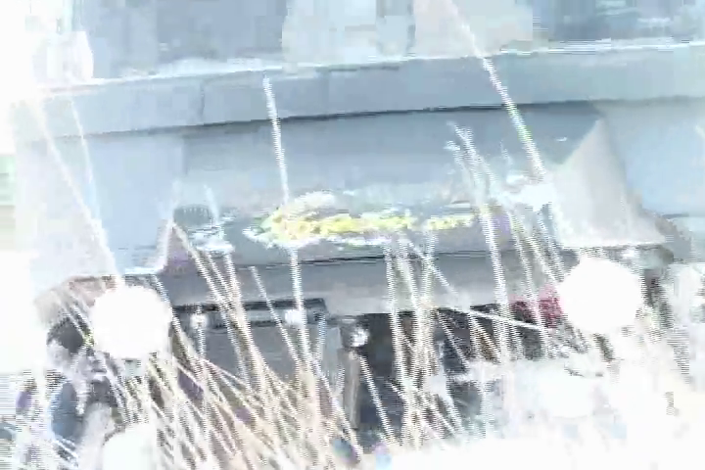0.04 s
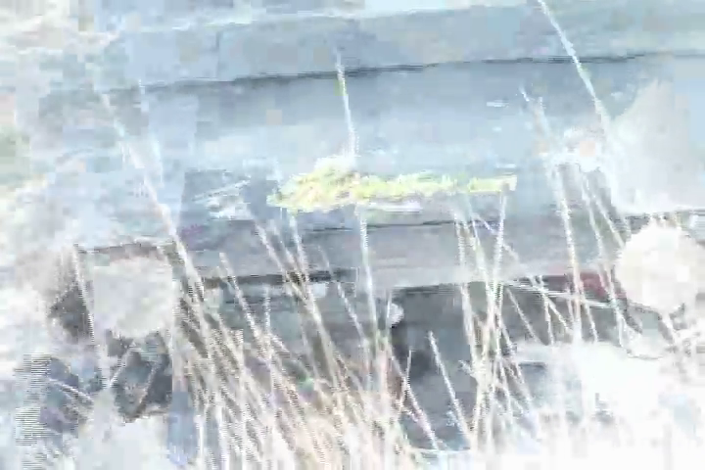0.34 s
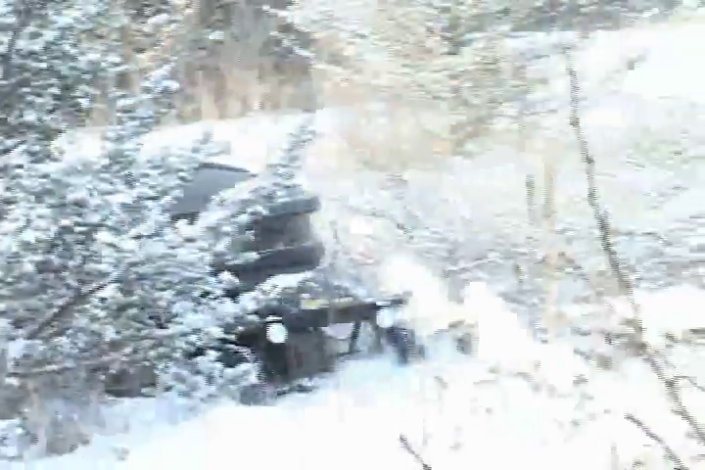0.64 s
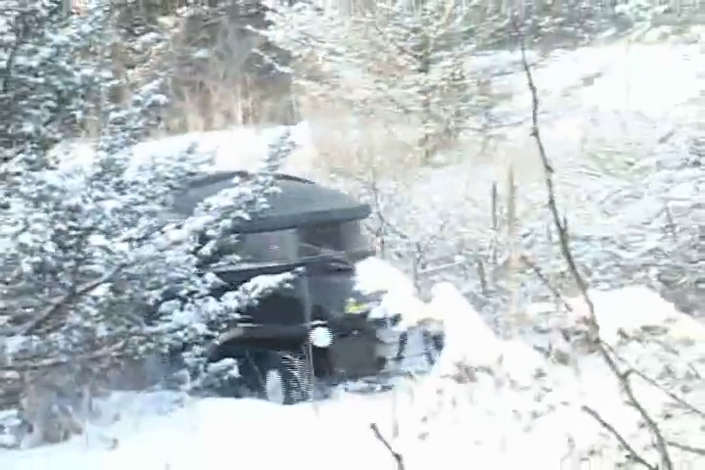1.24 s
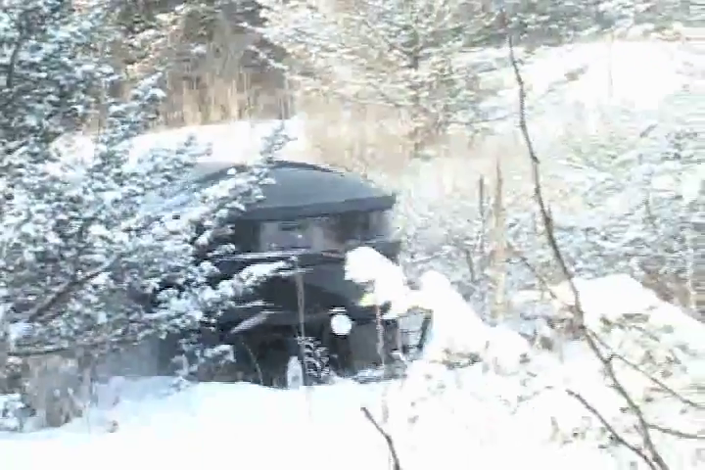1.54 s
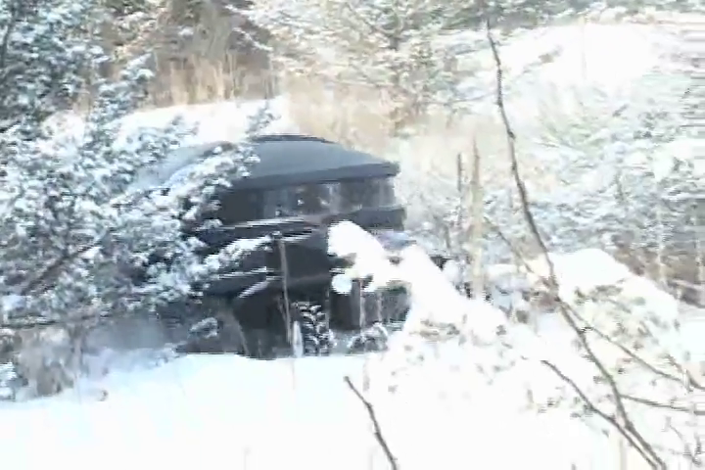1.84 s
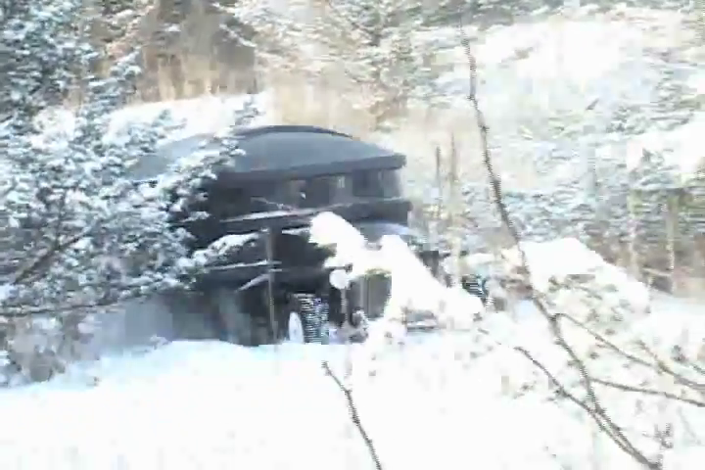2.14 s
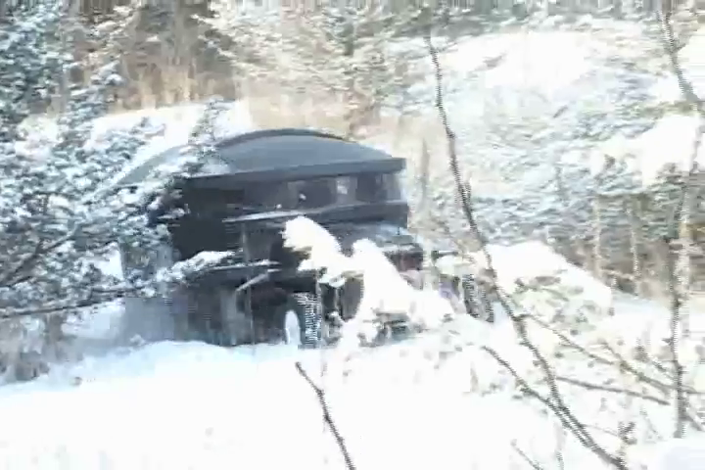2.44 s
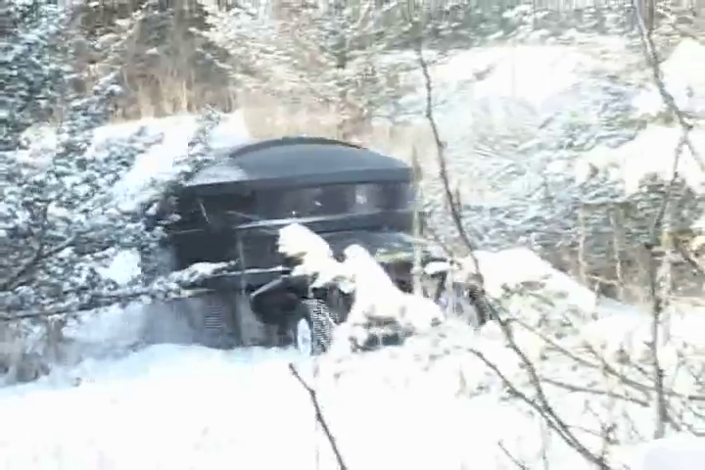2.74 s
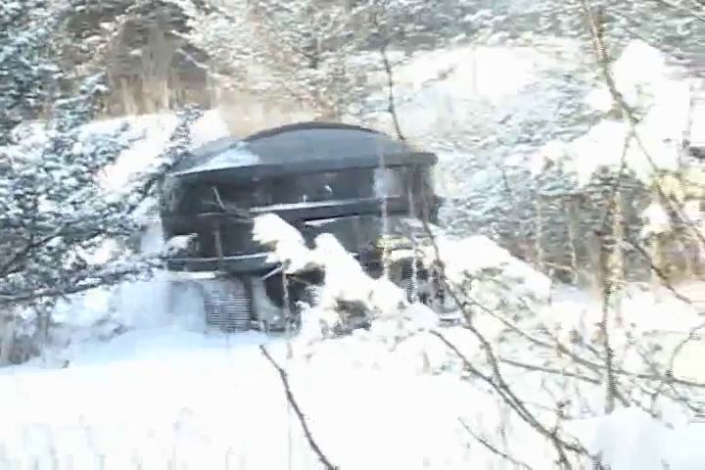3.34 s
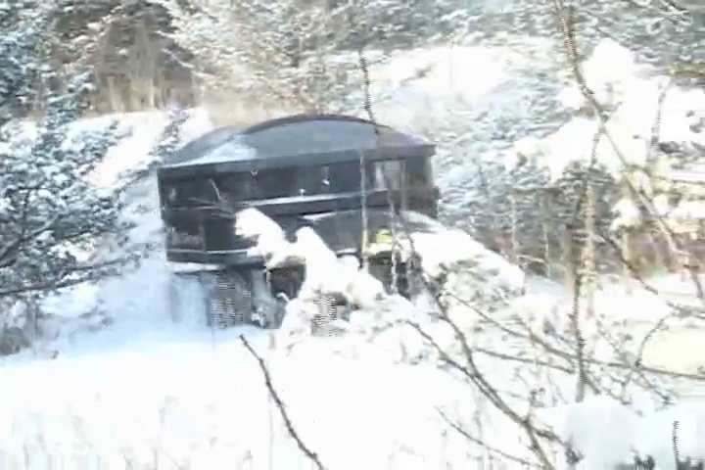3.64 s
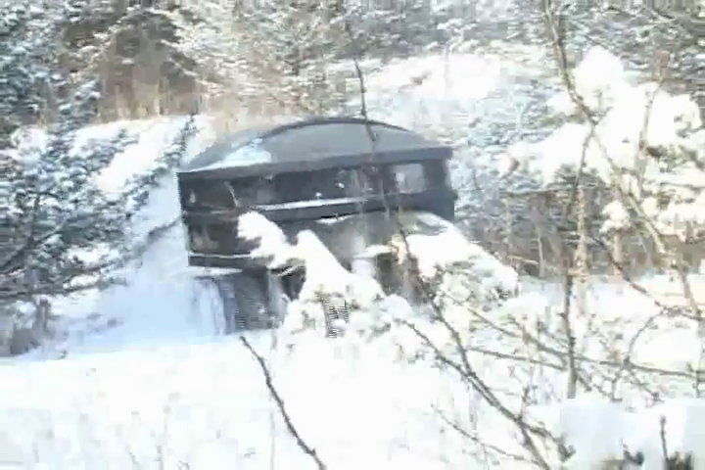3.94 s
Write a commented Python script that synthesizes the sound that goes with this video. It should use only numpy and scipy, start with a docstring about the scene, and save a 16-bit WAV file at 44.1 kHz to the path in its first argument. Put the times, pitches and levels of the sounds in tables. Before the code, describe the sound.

Throbbing, rattling engine of a tracked vehicle, close then farther off, knocking sharply twice.

```python
"""In snowy woods a tracked vehicle labours along, heard first close up, then from among the trees. Its exhaust
throbs, and blows in every turn of the engine make it clatter; from afar a gear whines too. A branch brushes
past, and snow and twigs crunch under the tracks. A low thud comes first, then two sharp, ringing knocks, each
with a dull thud of its own. Between the knocks the sound drops out for an instant. Towards the end, small loose
metal parts tick."""
import sys
import numpy as np
from scipy import signal
from scipy.fft import rfft, irfft
from scipy.io import wavfile
from scipy.ndimage import uniform_filter1d

SR = 44100
rng = np.random.default_rng(int(sys.argv[2]) if len(sys.argv) > 2 else 0)


def waveform_to_disk(signal):
    """Save audio, clipped to [-1, 1], as 16-bit WAV at the path in sys.argv[1]."""
    frames = np.transpose(np.atleast_2d(signal))
    scaled = np.clip(frames, -1, 1) * 32767
    samples = np.round(scaled).astype(np.int16)
    wavfile.write(sys.argv[1], SR, samples)


N = 176400
T = np.arange(N) / SR
HZ = np.fft.rfftfreq(N, 1 / SR)


def amp(db):
    """Turns decibels into a number to multiply by."""
    return 10 ** (np.asarray(db) / 20)


def unit(x):
    """Scales a sound to an average (rms) level of 1."""
    return x / np.sqrt(np.mean(x ** 2) + 1e-20)


def over_time(rows, column=1):
    """Joins the points of a time table with straight lines."""
    rows = np.array(rows)
    return np.interp(T, rows[:, 0], rows[:, column])


def over_hz(rows):
    """Joins the points of a frequency table."""
    hz, value = np.transpose(rows)
    return np.interp(np.log(HZ + 1), np.log(hz + 1), value)


def lows(hz, steepness=4):
    """A filter curve that keeps what lies below hz."""
    return 1 / (1 + (HZ / hz) ** steepness)


def filtered(x, gain):
    """Turns each frequency up or down."""
    return irfft(rfft(x) * gain, N)


def colour(x, db):
    """Shapes the tone with a dB curve, then sets the level to 1."""
    return unit(filtered(x, amp(db)))


def noise():
    """An even hiss."""
    return rng.standard_normal(N)


def sine(hz):
    """A pure tone that starts anywhere in its cycle."""
    return np.sin(2 * np.pi * (hz * T + rng.random()))


def drift(hz, step=25):
    """A random wobble, up to about hz times a second."""
    t = T[::step]
    smooth = np.exp(-(np.fft.rfftfreq(len(t), step / SR) / hz) ** 2)
    slow = irfft(rfft(rng.standard_normal(len(t))) * smooth, len(t))
    return np.interp(T, t, unit(slow))


def strike(start, rise_s, fall_s):
    """The loudness of a hit: it rises quickly, then dies away."""
    age = np.maximum(T - start, 0)
    return np.minimum(age / rise_s, 1) * np.exp(-np.maximum(age - rise_s, 0) / fall_s)


# Tone of the exhaust's low rumble: f/Hz, level/dB
RUMBLE_TONE = [(15, -20), (32, 0), (66, 0), (92, 0), (122, -22), (600, -50)]
def exhaust(turns, notes, waver=0.17, waver_hz=14, throb_db=1.2, rumble_db=-11.5):
    """Notes at multiples of the engine speed waver singly and throb together over a rumble."""
    hum = np.zeros(N)
    for multiple, db in notes:
        level = amp(db) * (1 + waver * drift(waver_hz))
        hum += level * np.cos(2 * np.pi * (multiple * turns + rng.random()))
    throb = amp(throb_db * drift(waver_hz))
    return unit(hum * throb) + amp(rumble_db) * colour(noise(), over_hz(RUMBLE_TONE))


# Blows in each engine turn: place in the turn (0-1), low rattle strength, treble strength
ENGINE_BLOWS = [(0.198, 0.51, 0.27), (0.361, 0.62, 0.63), (0.699, 0.34, 0.39)]
def clatter(turns, tone_db, repeat, uneven_db=3.55, grain_db=1.5, points=1200):
    """Blows in step with the crank ring the engine: a partly repeating rattle and a gritty treble."""
    pattern = np.interp(turns % 1, np.arange(points) / points, rng.standard_normal(points))
    low, high = 1.1, 1  # steady levels under the blows
    for place, low_strength, high_strength in ENGINE_BLOWS:
        blow = np.exp(-((turns - place) % 1) / .22)  # fades over .22 of a turn
        low = low + low_strength * blow * amp(uneven_db * drift(37))
        high = high + high_strength * blow * amp(uneven_db * drift(30))
    rattle = unit(low * (np.sqrt(repeat) * unit(pattern) + np.sqrt(1 - repeat) * noise()))
    surge = amp(2.2 * np.cos(2 * np.pi * (turns - .27)))  # the top treble swells once a turn
    grit = unit(high * noise() * amp(grain_db * drift(240)))
    fizz = unit(high * surge * noise() * amp(grain_db * drift(240)))
    rattle_share, grit_share = lows(2240), lows(7560, steepness=8)
    treble = filtered(grit, np.sqrt(grit_share)) + filtered(fizz, np.sqrt(1 - grit_share))
    both = filtered(rattle, np.sqrt(rattle_share)) + filtered(treble, np.sqrt(1 - rattle_share))
    return colour(both, tone_db)


# Exhaust notes close up: multiple of the engine speed, level/dB
CLOSE_NOTES = [(1, -7.5), (1.5, -15), (2, -0.5), (3, -.5), (4, -18), (5, -10.5), (11, -22), (16, -14.5),
               (19, -17)]
# Tone of the clatter close up: f/Hz, level/dB
CLOSE_TONE = [(120, -29), (200, -3.5), (268, -20), (392, -10), (480, -9), (600, -2.5), (812, -2.5),
              (923, -8.5), (1080, 0), (1220, 0.5), (1450, -11), (1710, -3), (2250, -8), (2470, -4),
              (3240, -4), (4030, -10), (8820, -18.5), (15500, -36)]
def close_engine(turns, exhaust_db=-24.5, clatter_db=-26.5):
    """Beside the engine, the exhaust is a little louder than the clatter."""
    hum = exhaust(turns, CLOSE_NOTES, waver=0.24)
    rattle = clatter(turns, over_hz(CLOSE_TONE), repeat=0.34, grain_db=-0.1)
    return amp(exhaust_db) * hum + amp(clatter_db) * rattle


def flicker(x, depth_db=1.13, rate_hz=9, count=8):
    """Each frequency band swells and fades a little on its own."""
    place = np.interp(np.log(HZ + 1), np.log([450, 11000]), [0, count - 1])
    bands = [filtered(x, np.maximum(1 - abs(place - k), 0)) for k in range(count)]
    return unit(sum(band * amp(depth_db * drift(rate_hz)) for band in bands))


# How hard the engine works, heard from the trees: t/s, exhaust level/dB, clatter level/dB
ENGINE_EFFORT = [(.5, -32.5, -28.5), (.55, -36, -28), (.62, -36.5, -35), (.7, -36, -32.5), (.86, -33, -30),
                 (1.0, -36.5, -33), (1.13, -32.5, -30.5), (1.27, -34, -31), (1.38, -36, -33),
                 (1.57, -37.5, -36), (1.7, -34.5, -32), (2.0, -33, -29), (2.17, -32, -28.5),
                 (2.65, -32, -29), (3.2, -30, -29.5), (3.7, -29, -27.5), (3.82, -29, -26), (4, -27.5, -28)]
# Exhaust notes from afar: multiple of the engine speed, level/dB
FAR_NOTES = [(1, -5), (1.5, -24), (2, 0), (2.5, -18), (3, -10.5), (4, -21), (5, -12.5), (6, -26), (7, -25),
             (8, -26), (13, -22)]
# Tone of the clatter from afar: f/Hz, level/dB
FAR_TONE = [(100, -31), (200, -7.5), (340, -10.5), (420, -8), (490, -4.5), (700, -.5), (880, -4), (1350, 2),
            (1730, -4), (1930, 1), (2400, -1), (3300, -1), (3750, -3.5), (4200, -3), (4380, -12),
            (4650, -4), (5200, -8.5), (5650, -3.5), (6200, -13.5), (6550, -7.5), (8000, -12.5), (9600, -14),
            (12000, -24.5), (15500, -35.5)]
# Pitches at which the engine covers ring: f/Hz, width/Hz, boost/dB
COVER_RINGS = [(467.4, 11, 7), (1040, 120, 5.5), (1080, 51, 5.5), (2026, 30, 3.5), (2630, 55, 2),
               (2917, 37, 5.5), (4630, 180, 3)]
def far_engine(turns, speed, whine_multiple=29.8, whine_db=-25.5, boom_db=4):
    """Exhaust and clatter follow the effort; a gear whine swells at pitches where the covers ring."""
    cover_db = sum(db / (1 + (2 * (HZ - hz) / width) ** 2) for hz, width, db in COVER_RINGS)
    rattle = flicker(clatter(turns, over_hz(FAR_TONE) + cover_db, repeat=.25))
    boom = filtered(rattle, lows(585))  # the low clatter follows the exhaust level
    wobble = 1 + drift(22) + 1j * drift(20)  # unsteady in both level and pitch
    gear = unit((wobble * np.exp(2j * np.pi * whine_multiple * turns)).real)
    whine = amp(whine_db + np.interp(whine_multiple * speed, HZ, cover_db)) * gear
    deep = amp(over_time(ENGINE_EFFORT)) * (exhaust(turns, FAR_NOTES) + amp(boom_db) * boom)
    bright = amp(over_time(ENGINE_EFFORT, column=2)) * (rattle - boom + whine)
    return deep + bright


# Dull thuds: t/s, level/dB, f/Hz
THUD_HITS = [(.5, -29.5, 37), (1.187, -25, 255), (2.243, -28.5, 214.9)]
def thuds(rise_cycles=0.88, fall_cycles=2.9):
    """Low bumps that die away within a few swings."""
    return sum(amp(db) * strike(start, rise_cycles / hz, fall_cycles / hz) * sine(hz)
               for start, db, hz in THUD_HITS)


# Gritty bursts: a branch brushing past at 0.511 s, then snow and twigs crunching under the tracks: t/s,
# level/dB
GRITTY_BURSTS = [(0.511, -27), (2.607, -28), (2.662, -27), (2.78, -26), (2.877, -28), (3.823, -32)]
# Tone of a crunch: f/Hz, level/dB
CRUNCH_TONE = [(800, -39), (2000, 3), (3200, 3), (5500, -1), (9000, -19), (15000, -52)]
def crunches(rise_s=0.0034, fall_s=0.0082):
    """A branch brushes past, and snow and twigs give way, in short gritty bursts."""
    bursts = sum(amp(db) * strike(start, rise_s, fall_s) for start, db in GRITTY_BURSTS)
    return bursts * colour(noise(), over_hz(CRUNCH_TONE))


# Sharp knocks: t/s, crack level/dB, body level/dB, rebound level/dB
KNOCK_HITS = [(1.176, -20, -21, -30.5), (2.221, -16, -20.5, -20)]
# Tone of a knock's first crack: f/Hz, level/dB
CRACK_TONE = [(500, -25), (2000, -8), (4000, -6), (5600, 1), (6200, -11), (6800, 0.5), (9500, -9),
              (11500, -20), (15500, -27)]
# Tone of its duller body: f/Hz, level/dB
BODY_TONE = [(80, -21), (250, -0.5), (1000, 1.5), (1700, -1.5), (3000, -1.5), (5500, -9.5), (9000, -13.5),
             (15000, -33)]
# Notes that ring on the rebound: f/Hz, relative level/dB, time to fade by 60 dB/s
REBOUND_NOTES = [(231.5, -8, 0.31), (384, -5, 0.23), (586, -4, 0.23), (800, -2, 0.068), (975, 6, 0.06),
                 (1073, 5, 0.04), (1440, -2, 0.069)]
def knocks(rebound_s=0.021, ring_db=-6):
    """A bright crack, a duller crunch after it, and a rebound that rings hollow."""
    out = np.zeros(N)
    for start, crack_db, body_db, rebound_db in KNOCK_HITS:
        crack = colour(noise(), over_hz(CRACK_TONE))
        out += amp(crack_db) * strike(start, .0005, 0.011) * crack
        body = colour(noise(), over_hz(BODY_TONE))
        dull = filtered(body, lows(3000))
        out += amp(body_db) * strike(start, 0.0035, 0.042) * dull
        out += amp(body_db) * strike(start, 0.0035, 0.031) * (body - dull)  # the treble dies sooner
        for hz, db, fade_s in REBOUND_NOTES:
            ring = strike(start + rebound_s, 0.0012, fade_s / np.log(1000)) * sine(hz)
            out += amp(rebound_db + ring_db + db) * ring
    return out


# Clear ticks of loose metal: t/s, level/dB
METAL_TICKS = [(2.976, -38), (3.032, -33), (3.045, -22), (3.267, -26), (3.296, -31), (3.307, -27),
               (3.335, -21), (3.340, -26), (3.362, -23), (3.389, -25), (3.417, -23), (3.469, -30.5),
               (3.645, -30), (3.659, -24), (3.764, -21), (3.842, -29)]
def ticks(turns, speed, ring_hz=5290, width_hz=800, fall_s=.0012, faint_from_s=2.7):
    """Loose metal rings briefly: a few clear ticks, and faint ones twice a turn."""
    band = 1 / (1 + ((HZ - ring_hz) / width_hz) ** 4)
    beat, part_of_beat = np.divmod(2 * turns, 1)
    faint_db = -31 + 2 * noise()[beat.astype(int)]  # a new random level for each tick
    faint = amp(faint_db) * np.exp(-part_of_beat / (2 * speed * fall_s)) * (T > faint_from_s)
    clear = sum(amp(db) * strike(start, 0.00056, fall_s) for start, db in METAL_TICKS)
    ring = unit(filtered(noise(), band))
    return filtered((faint + clear) * ring, np.sqrt(band))


# How alike left and right are, before `diffuse` scales the difference: f/Hz, likeness (1 = same)
LIKENESS = [(1400, 0.98), (2600, 0.95), (7000, 0.87), (9300, 0.56), (15000, 1)]
def stereo(x, lean, lead, diffuse, scatter_s):
    """Sound scattered by the surroundings makes left and right differ slightly."""
    direct = rfft(x)
    echoes = noise() * strike(0, 0.0012, scatter_s)
    scatter = np.exp(1j * np.angle(rfft(echoes)))  # smears the timing but keeps the tone
    share = np.clip(diffuse * (1 - over_hz(LIKENESS)) / 2, 0, 1)
    middle, side = direct * np.sqrt(1 - share), direct * scatter * np.sqrt(share)
    tilt = amp(over_hz(lean) / 2) * np.exp(.5j * lead)  # one side is louder or earlier
    return irfft(np.array([(middle + side) * tilt, (middle - side) / tilt]), N)


# Engine turns per second: t/s, f/Hz
ENGINE_SPEED = [(0, 36), (.28, 37.1), (.48, 36.46), (.57, 38.16), (.72, 35.12), (.92, 37.93), (1.08, 35.07),
                (1.25, 37.73), (1.42, 33.78), (1.58, 31.7), (1.98, 35.59), (2.28, 37.16), (2.49, 36.07),
                (2.7, 37.58), (2.87, 36.03), (3.26, 36.17), (3.44, 37.96), (3.59, 36.9), (3.85, 38.18),
                (4, 38.9)]
# How much louder near sounds are on the left: f/Hz, level/dB
CLOSE_BALANCE = [(150, 1.5), (700, 1), (4000, 0.7), (8000, 0)]
# How much louder far sounds are on the left: f/Hz, level/dB
FAR_BALANCE = [(150, 2.5), (600, 1.5), (1200, -1), (1530, 6), (1800, -6), (2230, 4.5), (2900, -1.5),
               (3430, 8.5), (3780, -2.5), (4550, 2.5), (5100, 0), (6500, 2), (7400, -1), (9200, 1),
               (15000, -1)]
# How far the left side runs ahead for far sounds: f/Hz, lead/radians
FAR_LEAD = [(1450, 0.095), (1650, -1.33), (2000, 0.77), (2700, -0.036), (3250, .4), (3650, -1),
            (4300, 0.53), (7000, 0.4), (12000, 0.53)]
def scene(switch_s=.487, fade_s=0.0049):
    """The engine close up, then from the trees, with thuds, crunches, knocks and ticks."""
    speed = over_time(ENGINE_SPEED)
    turns = np.cumsum(speed * (1 + 0.00505 * drift(16.53))) / SR  # engine turns so far
    far_share = np.clip((T - switch_s) / fade_s + .5, 0, 1)
    close = np.sqrt(1 - far_share) * close_engine(turns)
    far = np.sqrt(far_share) * far_engine(turns, speed) + ticks(turns, speed) + crunches()
    return (stereo(close, CLOSE_BALANCE, lead=0, diffuse=0.46, scatter_s=0.0041)
            + stereo(knocks() + thuds(), CLOSE_BALANCE, lead=0, diffuse=1.5, scatter_s=.004)
            + stereo(far, FAR_BALANCE, lead=over_hz(FAR_LEAD), diffuse=0.59, scatter_s=0.018))


def record(dry):
    """The sound drops out for an instant, and the very highest treble is cut away."""
    gap_start_s, gap_end_s, top_hz = 1.526, 1.5575, 15800
    sound_on = uniform_filter1d(1. * ((T < gap_start_s) | (T > gap_end_s)), size=40)
    treble_cut = signal.firwin(401, top_hz, window=("kaiser", 9), fs=SR)
    return signal.oaconvolve(dry * sound_on, treble_cut[None], "same")


dry = scene()
out = record(dry)
waveform_to_disk(out)
```